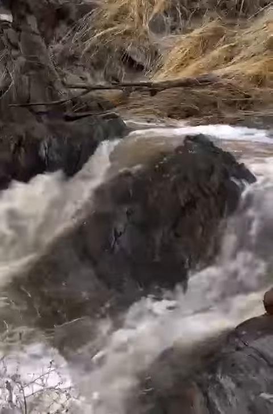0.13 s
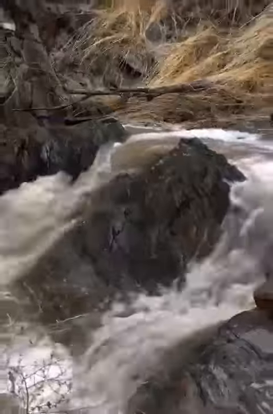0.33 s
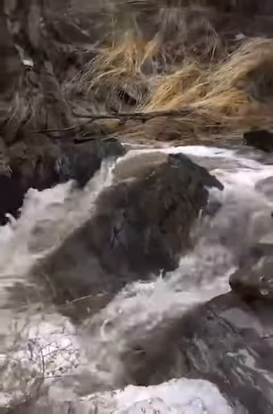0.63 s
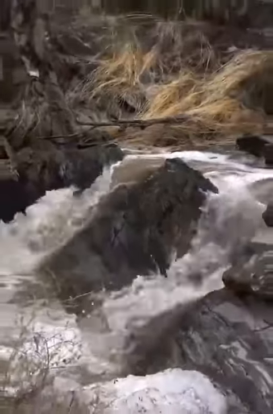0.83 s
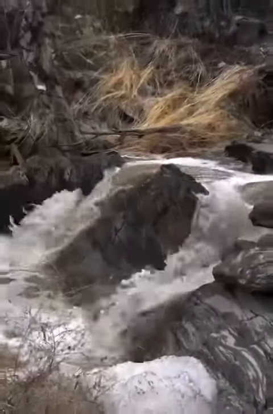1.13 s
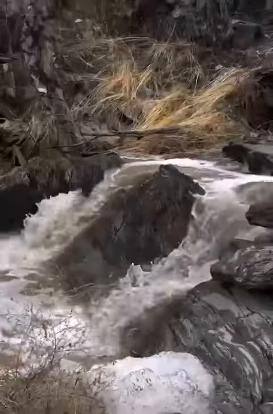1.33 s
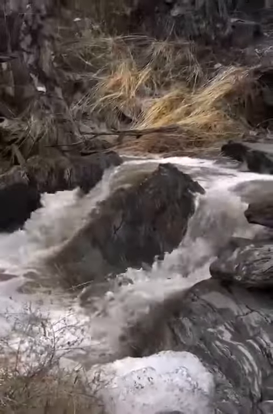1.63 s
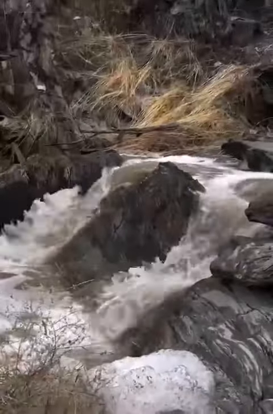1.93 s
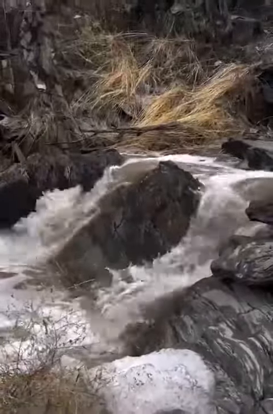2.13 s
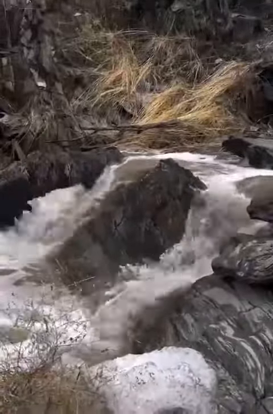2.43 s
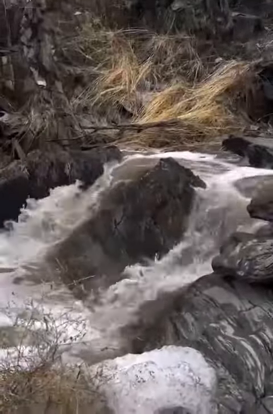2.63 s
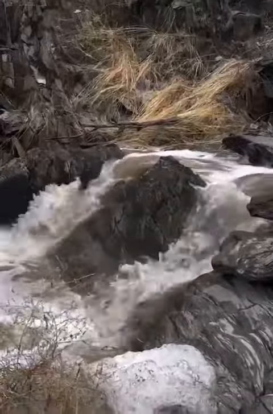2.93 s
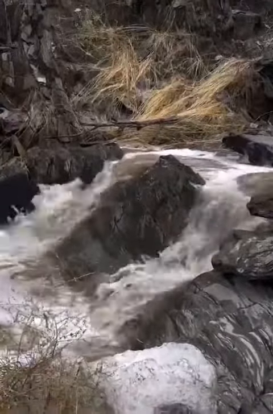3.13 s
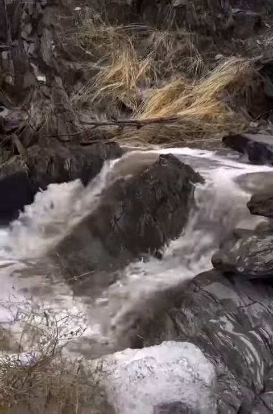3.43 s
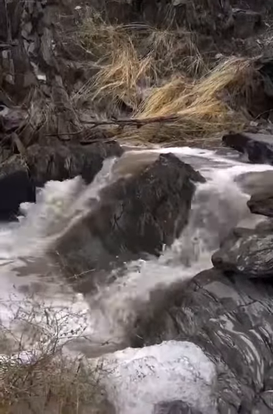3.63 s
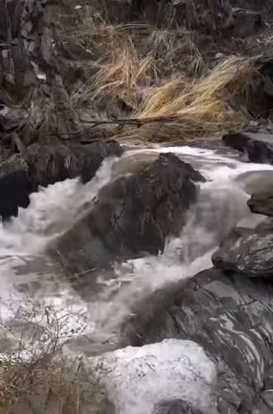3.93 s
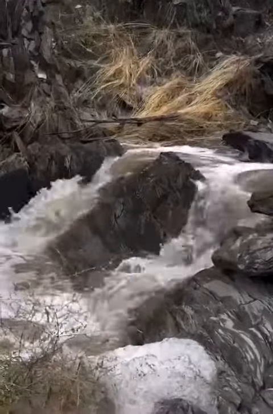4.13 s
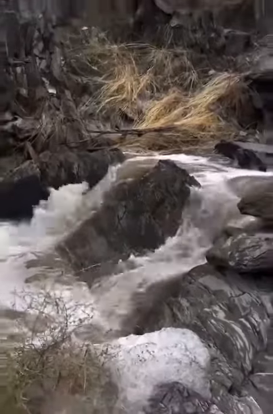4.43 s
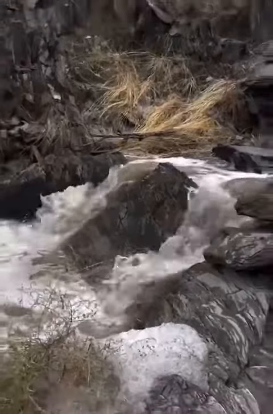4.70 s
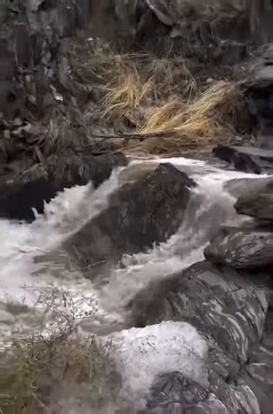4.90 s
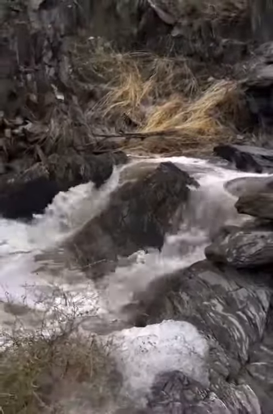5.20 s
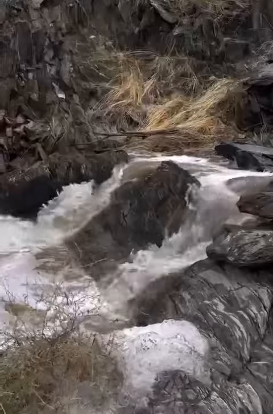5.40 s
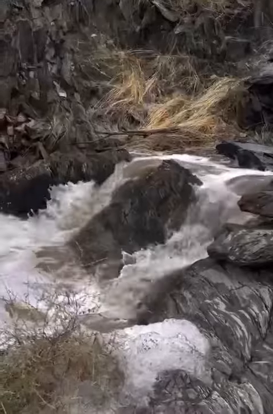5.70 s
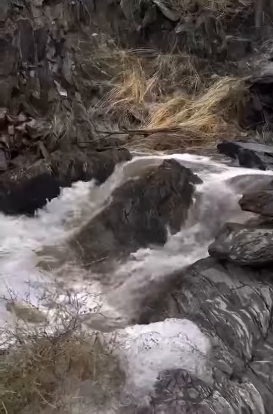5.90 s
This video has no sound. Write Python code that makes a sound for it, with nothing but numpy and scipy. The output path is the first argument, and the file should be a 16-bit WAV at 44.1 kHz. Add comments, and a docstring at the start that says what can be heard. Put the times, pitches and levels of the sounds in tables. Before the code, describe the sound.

A swollen stream roars steadily and close over rocks, with patchy foam noise, bubbling pockets and fine spray above a lumpy rumble. Low stone-like thuds crowd the first second. A six-cylinder engine drones nearby, rising for about two seconds, letting off during a gear change, then pulling again at a lower pitch until the end. Outdoors, stereo water, engine centred.

```python
"""From the start floodwater roars over boulders: patchy noise, ringing air pockets, spray, a lumpy low rumble.
The roar is slightly fuller around 500-700 Hz at first; low thuds crowd the first second; a few loud splashes
stand out. A six-cylinder engine drones close by, built from tones at multiples of its crankshaft rate plus
rough noise. It pulls up to 1.9 s, drops back for a gear change, then pulls again lower from 3.6 s. Its tones
boom through fixed resonances; between 2.4 and 4.1 s a bodywork panel hums up at times."""
import sys
import numpy as np
from scipy import signal
from scipy.fft import rfft, irfft
from scipy.io import wavfile
from scipy.ndimage import uniform_filter1d

SR = 44100
rng = np.random.default_rng(int(sys.argv[2]) if len(sys.argv) > 2 else 0)


def digitize_waveform(pressure):
    """Quantize a signal to 16-bit integers and store it at the path in sys.argv[1].

    Rows of a 2-D input are taken as channels; values are limited to [-1, 1].
    """
    field = np.atleast_2d(pressure).T
    bounded = np.clip(field, -1, 1)
    quanta = np.round(bounded * 32767).astype(np.int16)
    wavfile.write(sys.argv[1], SR, quanta)


N = 267025
TIME_S = np.arange(N) / SR
EDGE_HZ = 11740

# Water roar spectrum: (frequency [Hz], relative density [dB])
ROAR_SPECTRUM = [(30, -20), (100, -10), (200, -2), (380, -3), (500, -0.7), (640, -2), (830, 0.6),
                 (1200, -3), (1800, -7), (2300, -9.5), (4000, -13), (6700, -15.5), (9300, -15.5),
                 (10000, -12.5), (11000, -6.5), (11750, -13.5)]
# Slow swell of the roar: (time [s], level [dB])
ROAR_LEVEL = [(0, -28), (1, -27), (3.4, -28), (5.2, -27), (6.05, -28)]
# Stereo image of the water, left-right likeness: (frequency [Hz], likeness [0-1])
STEREO_LIKENESS = [(60, .99), (200, .96), (400, .86), (600, .52), (850, .88), (1100, .52), (1250, .85),
                   (1600, 1), (2200, 1), (2900, .88), (3700, .93), (4500, .65), (4870, 1), (5150, .58),
                   (5550, 1), (6300, 1), (6750, .87), (7150, .58), (7600, .6), (8150, .88), (8350, 1),
                   (9600, 1), (10300, .8), (11200, .74), (11800, .96)]
# Stereo image of the water, level: (frequency [Hz], left minus right [dB])
STEREO_TILT = [(200, 0), (420, 1.5), (620, 7.5), (900, 4.2), (1200, 4.8), (1600, 0)]
# Stereo image of the water, phase: (frequency [Hz], lead of left [rad])
STEREO_LEAD = [(0, 0), (330, .1), (520, 0.9), (740, -.15), (990, .5), (1200, -0.3), (1500, 0), (2100, 0),
               (2900, 0.25), (4050, 0.15), (4480, 1.3), (4850, 3.14), (5100, 4.2), (5340, 6.1),
               (6750, 6.45), (7750, 8.9), (8350, 9.42), (9600, 9.42), (10400, 10.5), (10900, 11.1),
               (11400, 12.1), (11900, 12.56)]
# Random sheets of water
SPLASHES_PER_S, SPLASH_RISE_S, SPLASH_GAIN_DB = 21, 0.013, -7.5
# Extra noise in the early roar: (frequency [Hz], relative density [dB])
EARLY_FULLNESS_SPECTRUM = [(250, -20), (450, 5), (700, 10), (950, 1), (2000, -68)]
EARLY_FULLNESS_DB, EARLY_FULLNESS_SIGMA_S = -39, 0.9
# Low rumble spectrum: (frequency [Hz], relative density [dB])
RUMBLE_SPECTRUM = [(20, -44), (35, -14), (50, -1.5), (75, 2), (105, 2.5), (150, -4), (178, -12), (215, -12),
                   (255, -7.5), (350, -12), (900, -102)]
RUMBLE_FLOOR_DB = -39.5
# Rumble surges, added to the floor as power: (time [s], sigma [s], peak level [dB])
RUMBLE_SURGES = [(0.06, 0.055, -32), (0.3, 0.099, -34), (0.678, 0.32, -37.5), (1.5, 0.28, -32.5),
                 (2.296, 0.24, -40.5), (2.87, 0.11, -38), (5.2, 1, -43)]
# Engine speed: (time [s], crankshaft rate [turns/s])
ENGINE_SPEED = [(0, 26.3), (.3, 26.55), (1.6, 30.58), (1.92, 31.15), (2.95, 21.7), (3.3, 20.42),
                (4.3, 21.12), (6.05, 23.28)]
# Throttle part open, wide open, shut for the gear change, wide open: (time [s], load [dB])
THROTTLE = [(0, -8), (1.02, -2), (1.93, -16), (3.61, 0.9)]
# Time constants: load builds in seconds, drops in cycles of the tone
LOAD_BUILD_S, LOAD_DROP_CYCLES = 0.32, 5.1
LOAD_ORDER_EXPONENT = 0.29  # higher orders depend more on load
# Engine tones before resonance and load:
# (multiple of crankshaft rate, level at 22 turns/s [dB], level at 31 turns/s [dB])
ENGINE_ORDERS = [(3, -20.4, -19.3), (5, -29, -29), (5.5, -42, -46), (6, -27.3, -23.5), (7, -40, -42),
                 (7.5, -35, -45), (8, -32, -36), (8.5, -39, -36), (9, -27, -28.5), (10, -47, -36.5),
                 (11, -36, -40), (12, -35, -37), (13.5, -36.5, -48), (14, -39.5, -42), (15, -41, -42),
                 (17, -37, -35), (18, -40, -35), (20, -36, -29), (22, -40, -42), (22.5, -35, -45),
                 (23, -41, -42), (26, -35, -32), (33, -38, -26)]
# Exhaust and bodywork resonances: (frequency [Hz], width [Hz], peak gain [dB])
BODY_RESONANCES = [(70, 10, -6.5), (93, 13, -6), (106, 6, .5), (114, 14, -.8), (137, 11, -5), (181, 9, -.3),
                   (196, 7, -3), (247, 12, -3.5), (277, 10, -7.5), (304, 10, .5), (346, 14, -5),
                   (400, 30, -10), (483, 25, -10), (710, 120, -12)]
# Brief flares and dips of one tone: (time [s], sigma [s], multiple of crankshaft rate, added gain [dB])
TONE_FLARES = [(.53, .031, 3, -2), (.75, .3, 9, 3.5), (1.35, 0.11, 9, -9), (.8, 0.13, 6, -6),
               (0.97, 0.047, 12, 14), (.97, .09, 33, 11), (1.454, 0.054, 20, 21), (1.582, 0.054, 8, 4.5),
               (1.617, .07, 10, 2.5), (1.85, 0.1, 23, 20.5), (1.87, .06, 10, 7), (3.4, 0.24, 3, -11),
               (3.7, 0.15, 9, -5), (4.4, .25, 8, 3.5), (4.5, 0.1, 23, 6), (4.62, 0.25, 14, 2),
               (4.904, 0.25, 11, 3.5), (5.423, 0.1, 22, 11), (5.45, 0.17, 26, 5), (5.75, 0.33, 18, 11),
               (5.8, 0.092, 15, 6), (5.85, .25, 8.5, -4), (5.85, 0.16, 12, 3), (5.9, 0.098, 17, 10.5),
               (5.95, .25, 8, -20)]
# Combustion noise spectrum: (frequency [Hz], relative density [dB])
GROWL_SPECTRUM = [(60, -1.5), (150, 3), (280, 8.5), (400, -0.5), (550, 1.5), (800, -6), (1100, -2.5),
                  (2000, -86)]
# Panel swells to a clear tone: (time [s], sigma [s], peak level [dB])
PANEL_SWELLS = [(2.48, .08, -38), (2.67, .05, -41.5), (3.415, 0.03, -37), (3.716, 0.052, -29.5),
                (4.02, 0.047, -33.5)]
# Intake rush spectrum: (frequency [Hz], relative density [dB])
INTAKE_SPECTRUM = [(300, -40), (550, 3.5), (750, 9), (1000, 3), (1400, -3.5), (3000, -5), (6000, -67)]
# Intake level at 0 dB load and the reference speed; growth in dB per turn/s
INTAKE_DB, INTAKE_REF_TURNS_PER_S, INTAKE_GROWTH_DB = -31, 31.8, 3
# Thuds like stones knocking under water: (time [s], body gain [dB], pitch [Hz])
THUDS = [(0.016, -24.5, 112), (.112, -28, 86.6), (0.191, -21, 82), (0.222, -24, 106), (0.255, -16, 71.6),
         (0.284, -18, 79.4), (.309, -20, 102), (0.334, -31, 73), (0.361, -35, 77), (0.398, -24, 68),
         (0.511, -31, 81), (0.721, -36, 89), (0.777, -23.5, 62), (.864, -20, 86), (1.004, -23, 86),
         (1.451, -37, 68), (2.784, -28, 74.5), (2.822, -26, 73), (3.135, -30, 170)]
# Time to peak of a thud's body; overtone as multiple of the pitch, and its gain
THUD_RISE_S, KNOCK_RATIO, KNOCK_DB = 0.0092, 2.22, -5
# Further splashes, the loudest, at set moments: (time [s], gain [dB], centre frequency [Hz])
LOUD_SPLASHES = [(.053, 4, 2000), (2.552, 4, 775), (2.811, -1, 865), (3.015, 1, 1460), (3.432, 6, 1810),
                 (3.808, 6.5, 690), (5.413, 7.5, 1890), (5.497, 7, 870), (5.8, 0, 2410)]
LOUD_SPLASH_BAND_HZ = 150  # scale of each loud splash's Gaussian band


def gain_of(db):
    """Decibels to amplitude."""
    return 10 ** (np.asarray(db) / 20)


def evened(x):
    """Scales to rms 1."""
    return x / np.sqrt(np.mean(x ** 2) + 1e-20)


def at_time(curve):
    """Interpolates a curve at every sample."""
    return np.interp(TIME_S, *np.transpose(curve))


def at_hz(points, hz):
    """Interpolates a spectrum on a log-frequency axis."""
    f_hz, value = np.transpose(points)
    return np.interp(np.log(hz + 1), np.log(f_hz + 1), value)


def coloured(x, points):
    """Filters by a spectrum table, then scales to rms 1."""
    gain = gain_of(at_hz(points, np.fft.rfftfreq(N, 1 / SR)))
    return evened(irfft(rfft(x) * gain, N))


def drift(rate_hz):
    """Slow random signal of rms 1, no faster than about rate_hz."""
    steps = signal.resample_poly(rng.standard_normal(400), 8, 1)
    return evened(np.interp(TIME_S * rate_hz * 2, np.arange(len(steps)) / 8, steps))


def bump(s, sigma_s):
    """Gaussian rise and fall of height 1 around a moment."""
    return np.exp(-((TIME_S - s) / sigma_s) ** 2 / 2)


def smooth_grid(shape, bins, frames):
    """Random time-frequency grid of rms 1, averaged over bins and frames."""
    grid = uniform_filter1d(rng.standard_normal(shape), size=bins, axis=0)
    return evened(uniform_filter1d(grid, size=frames, axis=1))


def churn(patch_db=1.12, flicker_db=0.85, surge_db=0.15):
    """Two noises broken into shared patches: sheets of water collapse, each in its own band and moment."""
    z = signal.stft(rng.standard_normal((2, N)), nperseg=512, noverlap=384)[2]
    shape = z.shape[1:]
    patches = smooth_grid(shape, 7, 18)
    flicker = smooth_grid(shape, 70, 4)
    surge = np.interp(np.linspace(0, TIME_S[-1], shape[1]), TIME_S, drift(6.4))
    z = z * gain_of(patch_db * patches + flicker_db * flicker + surge_db * surge)
    return evened(signal.istft(z, nperseg=512, noverlap=384)[1][:, :N])


def grains(low_hz, high_hz, per_s, cycles, glide, spread_db, count=24):
    """Air pockets of many sizes ring briefly, rising in pitch as they near the surface."""
    out = np.zeros(N)
    for hz in np.geomspace(low_hz, high_hz, count):
        age = np.arange(int(5 * cycles / hz * SR)) / SR * hz / cycles  # in decay times
        envelope = np.exp(-age) * (1 - np.exp(-6 * age))
        ring = envelope * np.sin(2 * np.pi * cycles * (age + glide * age ** 2 / 2))
        births = rng.random(N) < per_s / count / SR
        sizes = gain_of(spread_db * np.minimum(rng.exponential(1, N), 4))
        out += np.sqrt(hz) * evened(signal.oaconvolve(births * sizes, ring)[:N])
    return evened(out)


def splashes(low_hz=550, high_hz=2400, octaves=0.2, count=6):
    """Short bursts of foam at random moments, each in its own band, rise quickly and drain away."""
    age = np.arange(SR // 6) / SR / SPLASH_RISE_S
    hz = np.fft.rfftfreq(N, 1 / SR) + 1
    out = np.zeros(N)
    for centre_hz in np.geomspace(low_hz, high_hz, count):
        births = rng.random(N) < SPLASHES_PER_S / count / SR
        band = np.exp(-(np.log2(hz / centre_hz) / octaves) ** 2 / 2)
        foam = irfft(rfft(rng.standard_normal(N)) * band, N)
        out += foam * signal.oaconvolve(births.astype(float), age * np.exp(1 - age))[:N]
    return out


def water(bubbles_db=-16, gurgles_db=-18.5, spray_db=-11):
    """Churning foam, bubbles, spray and splashes, heard as a partly alike left and right."""
    direct, diffuse = churn()
    direct = direct + gain_of(bubbles_db) * grains(343.7, 2797, 900, 6.55, 0.053, 1.6)
    # some pockets ring for many more cycles
    direct = direct + gain_of(gurgles_db) * grains(450, 2200, 80, 28.4, 0.012, 2.7)
    direct = direct + gain_of(spray_db) * grains(2590, 13000, 2500, 1.8, 0.049, 2.2)
    direct = direct + gain_of(SPLASH_GAIN_DB) * splashes() + loud_splashes()
    hz = np.fft.rfftfreq(N, 1 / SR)
    left = rfft(direct)
    likeness = np.clip(at_hz(STEREO_LIKENESS, hz), 0, 1)
    right = likeness * left + np.sqrt(1 - likeness ** 2) * rfft(diffuse)
    right = right * np.exp(-1j * np.interp(hz, *np.transpose(STEREO_LEAD)))
    tilt = gain_of(at_hz(STEREO_TILT, hz))
    stereo = np.array([left * tilt, right]) / np.sqrt(1 + tilt ** 2)
    stereo = stereo * gain_of(at_hz(ROAR_SPECTRUM, hz))
    return evened(irfft(stereo, N)) * gain_of(at_time(ROAR_LEVEL))


def early_fullness():
    """The roar is slightly fuller around 500-700 Hz at the start, then this extra noise fades."""
    noise = coloured(rng.standard_normal(N), EARLY_FULLNESS_SPECTRUM)
    return noise * gain_of(EARLY_FULLNESS_DB) * bump(0, EARLY_FULLNESS_SIGMA_S)


def rumble():
    """Low lumpy noise whose power surges now and then."""
    power = gain_of(RUMBLE_FLOOR_DB) ** 2
    for s, sigma_s, peak_db in RUMBLE_SURGES:
        power = power + (gain_of(peak_db) * bump(s, sigma_s)) ** 2
    return coloured(rng.standard_normal(N), RUMBLE_SPECTRUM) * np.sqrt(power)


def engine_load(hz):
    """Load in dB at a frequency: settles towards each throttle setting; on a drop, low tones die last."""
    load_db = np.full(N, float(THROTTLE[0][1]))
    for (_, before_db), (s, after_db) in zip(THROTTLE, THROTTLE[1:]):
        lag_s = LOAD_BUILD_S if after_db > before_db else LOAD_DROP_CYCLES / hz
        load_db += (after_db - before_db) * (1 - np.exp(-np.clip((TIME_S - s) / lag_s, 0, 20)))
    return load_db


def body_gain(tone_hz):
    """Fixed exhaust and bodywork resonances, summed as power, boom where a tone meets them."""
    power = sum(gain_of(peak_db) ** 2 / (1 + (2 * (tone_hz - hz) / width_hz) ** 2)
                for hz, width_hz, peak_db in BODY_RESONANCES)
    return np.sqrt(power)


def engine(growl_db=-36.0, growl_hz=280, uneven_db=0.1061, throb=0.5):
    """Three firings a turn give the main tones, unequal cylinders the other orders; growl throbs with firing."""
    speed = at_time(ENGINE_SPEED)
    turns = np.cumsum(speed) / SR
    tones = np.zeros(N)
    for order, slow_db, fast_db in ENGINE_ORDERS:
        db = np.interp(speed, [22, 31], [slow_db, fast_db])
        db = db + engine_load(order * speed.max()) * (order / 6) ** LOAD_ORDER_EXPONENT
        for s, sigma_s, flare_order, added_db in TONE_FLARES:
            if round(2 * flare_order) == round(2 * order):
                db = db + added_db * bump(s, sigma_s)
        db = db + uneven_db * order * drift(6)  # higher tones waver more
        offset_cycles = rng.random() * (order % 3 != 0)  # firing orders stay in phase
        wave = np.cos(2 * np.pi * (order * turns + offset_cycles))
        tones += body_gain(order * speed) * gain_of(db) * wave
    # every firing also lets out a puff of rough noise
    firing = np.cos(2 * np.pi * 3 * turns)
    growl = coloured(rng.standard_normal(N) * (1 + throb * firing), GROWL_SPECTRUM)
    return np.sqrt(2) * tones + gain_of(growl_db + engine_load(growl_hz)) * growl


def intake(hz=300):
    """Air rushes into the engine: noise louder with load and much louder with speed."""
    db = INTAKE_DB + engine_load(hz)
    db = db + INTAKE_GROWTH_DB * (at_time(ENGINE_SPEED) - INTAKE_REF_TURNS_PER_S)
    return coloured(rng.standard_normal(N), INTAKE_SPECTRUM) * gain_of(db)


def thuds(lowest_hz=42):
    """Each thud is a few decaying low cycles, with a shorter overtone for the knock."""
    out = np.zeros(N)
    t_s = np.arange(SR // 8) / SR
    age = t_s / THUD_RISE_S
    for s, db, hz in THUDS:
        body = age * np.exp(1 - age) * np.sin(2 * np.pi * hz * t_s)
        knock = 2 * age * np.exp(1 - 2 * age) * np.sin(2 * np.pi * hz * KNOCK_RATIO * t_s)
        out[round(s * SR):][:len(t_s)] += gain_of(db) * (body + gain_of(KNOCK_DB) * knock)
    return signal.sosfilt(signal.butter(2, lowest_hz, "high", fs=SR, output="sos"), out)


def loud_splashes():
    """Further, louder splashes at set moments: short banded noise bursts that rise fast and drain away."""
    hz = np.fft.rfftfreq(N, 1 / SR)
    out = np.zeros(N)
    for s, db, centre_hz in LOUD_SPLASHES:
        age = np.maximum(TIME_S - s, 0) / SPLASH_RISE_S
        band = np.exp(-((hz - centre_hz) / LOUD_SPLASH_BAND_HZ) ** 2 / 2)
        noise = irfft(rfft(rng.standard_normal(N)) * band, N)
        out += gain_of(db) * age * np.exp(1 - age) * noise
    return out


def panel(hz=182, width_hz=12, db=-43.5):
    """A bodywork resonance hums unevenly throughout, even off load, and at times swells to a clear tone."""
    angle = 2 * np.pi * hz * TIME_S
    hum = drift(width_hz) * np.cos(angle) + drift(width_hz) * np.sin(angle)
    swell = sum(gain_of(peak_db) * bump(s, sigma_s) for s, sigma_s, peak_db in PANEL_SWELLS)
    return gain_of(db) * hum + swell * np.sqrt(2) * np.sin(angle)


def scene():
    """Sums the layers; all but the stereo water are alike in left and right."""
    return water() + early_fullness() + rumble() + engine() + intake() + thuds() + panel()


def record(dry):
    """Linear-phase lowpass at EDGE_HZ."""
    lowpass = signal.firwin(511, EDGE_HZ, window=("kaiser", 9), fs=SR)
    return signal.oaconvolve(dry, lowpass[None], "same", axes=1)


dry = scene()
out = record(dry)
digitize_waveform(out)
```